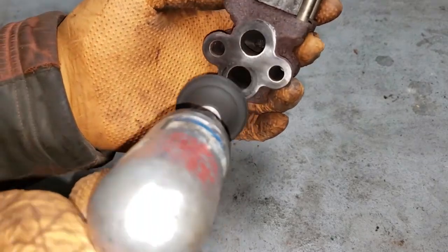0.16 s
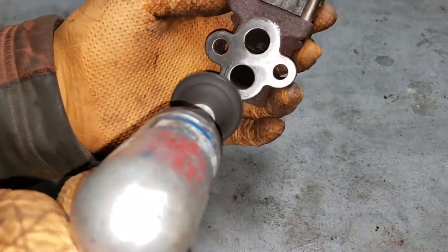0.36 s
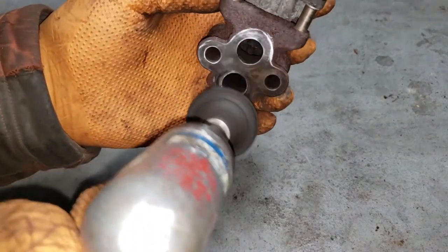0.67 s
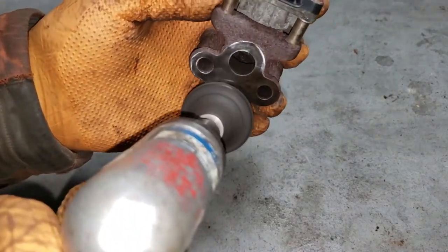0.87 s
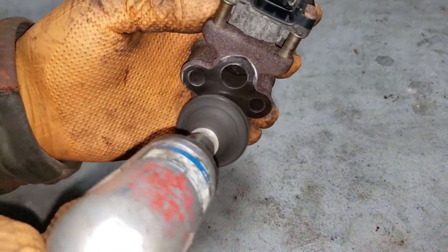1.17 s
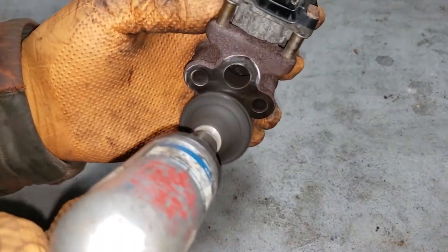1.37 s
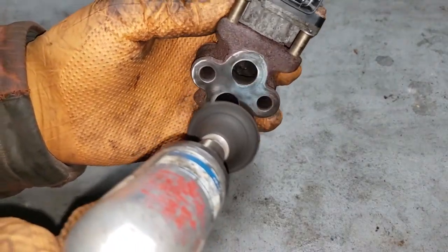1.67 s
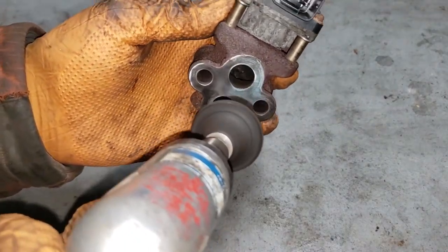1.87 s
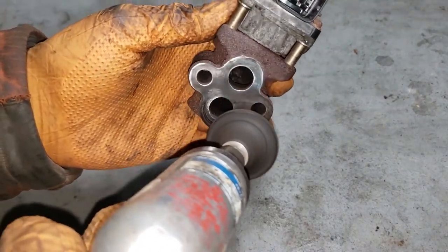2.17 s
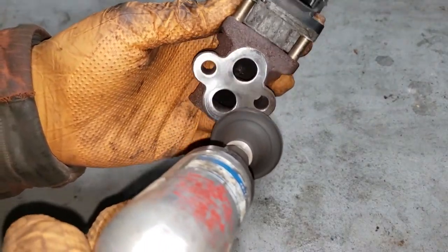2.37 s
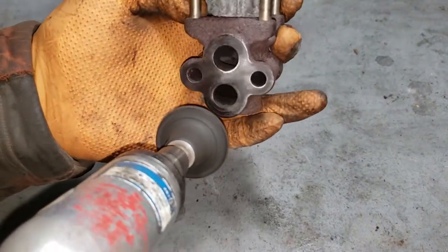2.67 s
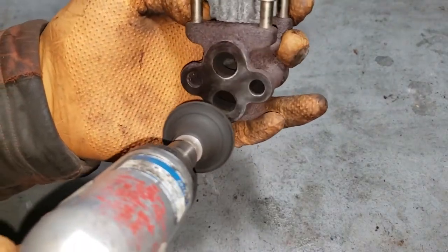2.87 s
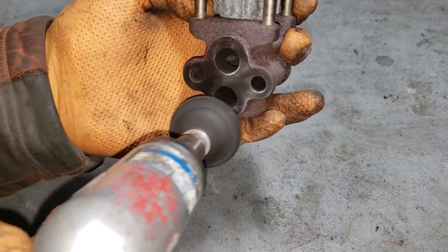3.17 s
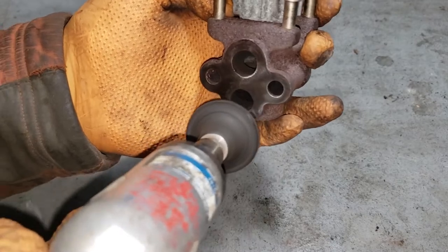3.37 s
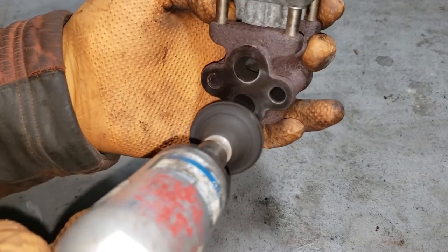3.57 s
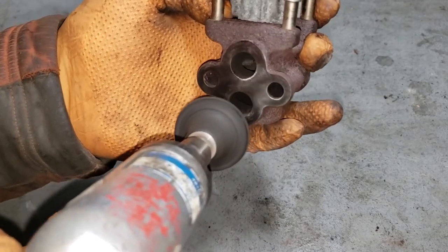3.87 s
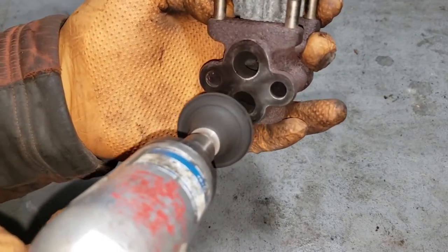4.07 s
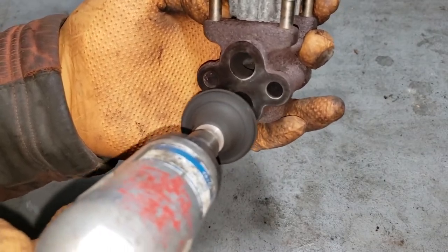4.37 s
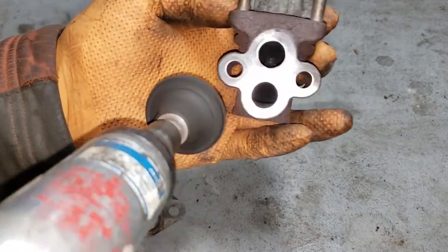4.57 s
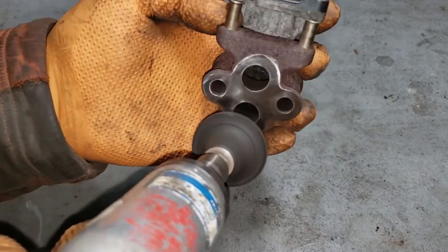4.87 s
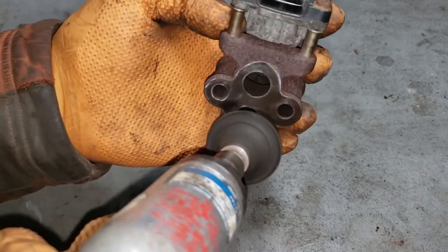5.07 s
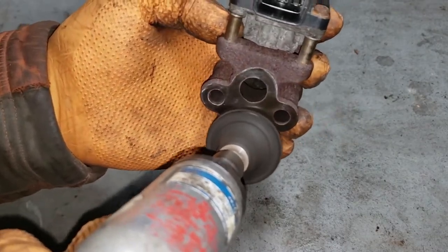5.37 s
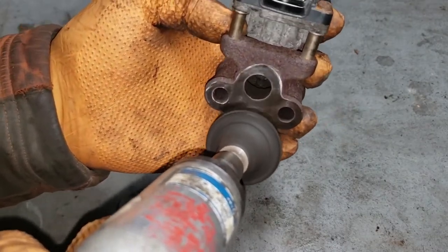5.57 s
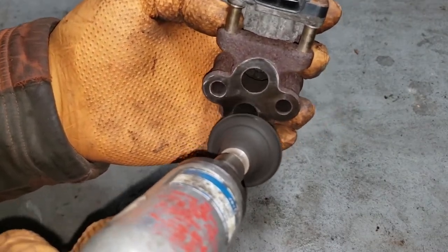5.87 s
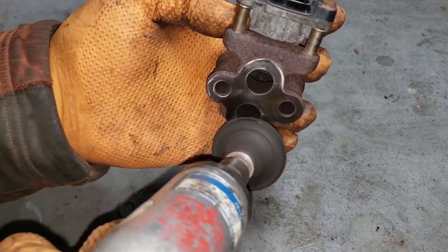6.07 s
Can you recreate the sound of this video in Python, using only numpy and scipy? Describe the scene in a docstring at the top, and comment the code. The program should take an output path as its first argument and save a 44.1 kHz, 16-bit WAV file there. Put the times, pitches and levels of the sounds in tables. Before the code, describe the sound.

An air grinder whines and hisses as it sands rusty metal up close, briefly winding down twice and spinning back up faster.

```python
"""A hissing whine with a rasp under it: an air die grinder sands rust off a hand-held iron casting,
close by in a garage. Its four-vane rotor hums and whines through the housing, the exhaust hisses
in puffs, and the small disc scrapes and sings on the metal. Pressure on the disc sags the speed;
twice the air drops away, the rotor runs down and then spins up again."""
import sys
import numpy as np
from scipy import signal
from scipy.fft import rfft, irfft, next_fast_len
from scipy.io import wavfile

SR = 44100
rng = np.random.default_rng(int(sys.argv[2]) if len(sys.argv) > 2 else 0)


def transcribe(u):
    """Save the signal u as a 16-bit wav file named by the first command-line argument.

    u: samples, shape (n,) or (channels, n), limited to [-1, 1]; the rate is SR.
    q: integer samples, one column per channel.
    """
    v = np.clip(np.atleast_2d(u).T, -1, 1)
    q = np.round(v * 32767).astype(np.int16)
    wavfile.write(sys.argv[1], SR, q)


N = 274302
TIME_S = np.arange(N) / SR
FFT_SIZE = 2 * next_fast_len(N // 2 + 1, True)
BINS_HZ = np.fft.rfftfreq(FFT_SIZE, 1 / SR)
CRUISE_HZ, ROTOR_LAG_S = 140, 0.018  # middling shaft speed; rotor's lag behind the air supply

# Housing and exhaust passage resonances: centre_hz, half_width_hz, tone_gain_db, hiss_lift_db
HOUSING_MODES = [(1165, 247, -27, 0.5), (1404, 242, -24, -9.5), (2337, 200, -18, -3), (2706, 400, -18, 0.5),
                 (3330, 380, -19, -3.5), (4191, 103, -2.5, 2), (4537, 90, -3.5, 8), (7475, 170, -16, 5),
                 (10800, 360, -6.5, 2), (12280, 460, -9.5, 2.5)]
# Speed under load with the valve open, one table per sanding pass: time_s, shaft_hz
PASS_SPEEDS = [
    [(0.0, 115.5), (0.15, 110.8), (0.35, 117.9), (0.8, 114.2), (1.0, 104.5), (1.2, 104.1), (1.5, 107.0),
     (1.8, 105.9), (2.1, 104.0), (2.39, 104.2)],
    [(2.77, 169.5), (3.1, 163.5), (3.3, 163.0), (3.57, 161.7), (3.8, 151.6), (4.15, 149.0), (4.39, 136.5),
     (4.6, 131.2)],
    [(4.81, 179.5), (4.9, 177.2), (4.96, 167.8), (5.15, 154.0), (5.34, 144.4), (5.52, 144.0), (5.63, 148.5),
     (5.9, 136.0), (6.05, 140.0), (6.22, 135.4)],
]
# Hold on the tool, one row per pass: order_16_db, order_20_db, notch_hz
PASS_GRIPS = [(1, -1.5, 3110), (2.5, 2.5, 3680), (4.5, -1, 3560)]
# Valve eased off between passes: closing_s, lowest_s, opening_s, open_s, air_drop_db, shudder_db
AIR_CUTS = [(2.488, 2.612, 2.614, 2.724, -15.5, 11.5), (4.61, 4.72, 4.73, 4.765, -13.5, 1.5)]


def amp(db):
    """Decibels to gain."""
    return 10 ** (np.asarray(db) / 20)


def peak(hz, centre_hz, half_width_hz):
    """Resonance bell, 1 at its top."""
    return 1 / (1 + ((hz - centre_hz) / half_width_hz) ** 2)


def bump(centre_s, half_s):
    """Bell in time, 1 at its top."""
    return np.exp(-((TIME_S - centre_s) / half_s) ** 2)


def curve(rows, column=1):
    """One column of a time table at every sample."""
    rows = np.array(rows)
    return np.interp(TIME_S, rows[:, 0], rows[:, column])


def at_hz(rows, hz):
    """Frequency table interpolated on a log axis."""
    row_hz, values = np.transpose(rows)
    return np.interp(np.log(hz + 1), np.log(row_hz + 1), values)


def drift(rate_hz):
    """Random wander of rms 1, rolled off above the rate."""
    t = np.linspace(0, N / SR, 2 ** 14)
    low_pass = peak(np.fft.rfftfreq(len(t), t[1]), 0, rate_hz)
    wander = irfft(rfft(rng.standard_normal(len(t))) * low_pass)
    return np.interp(TIME_S, t, wander / np.sqrt(np.mean(wander ** 2)))


def ports(hz):
    """Complex gains of the left and right microphone ports, mean power 1."""
    # Level between ports: freq_hz, left_minus_right_db
    balance = [(100, 2), (450, 2), (750, -1), (1500, 8.5), (1850, 4), (2600, 6.5), (3600, 1.5), (5000, 7.5),
               (5900, 13.5), (8300, 2.5), (10500, 11), (12000, -2.5), (13500, 15), (16000, -12)]
    # Phase between ports: freq_hz, left_lead_rad
    lead = [(50, 0), (400, .6), (1500, 1.4), (1900, 3.1), (2400, 6.1), (3100, 6.6), (3500, 8.9), (4400, 11),
            (5200, 11.7), (6200, 16), (7300, 18), (8200, 20), (10600, 27), (12400, 31), (16000, 32)]
    left = amp(at_hz(balance, hz) / 2) * np.exp(0.5j * at_hz(lead, hz))
    pair = np.array([left, 1 / left])
    return pair / np.sqrt(np.mean(abs(pair) ** 2, axis=0))


def noise(spectrum_db):
    """Coloured noise, partly alike at the two ports; their average has rms 1."""
    # Likeness of the ports: freq_hz, coherence
    likeness = [(50, 0.54), (400, 0.47), (1400, 1), (1900, 0.58), (2600, 0.15), (3800, 0.043), (4550, 1),
                (5500, 0.32), (16000, 0.084)]
    common, separate = rfft(rng.standard_normal((2, FFT_SIZE)))
    coherence = np.clip(at_hz(likeness, BINS_HZ), 0, 1)
    spectra = np.array([common, coherence * common + np.sqrt(1 - coherence ** 2) * separate])
    pair = irfft(spectra * ports(BINS_HZ) * amp(spectrum_db))[:, :N]
    return pair / pair.mean(0).std()


def tone(hz, steady, flutter, flutter_hz):
    """Line at both ports, with a steady and a fluttering part."""
    envelope = steady + flutter * (drift(flutter_hz) + 1j * drift(flutter_hz))
    carrier = np.exp(2j * np.pi * (np.cumsum(hz) / SR + rng.random()))
    port_gains = np.repeat(ports(hz[::64]), 64, axis=1)[:, :N]
    return (port_gains * envelope * carrier).real


def by_pass(values):
    """One value or curve per pass, crossfaded as the valve reopens."""
    out = values[0]
    for value, (_, _, opening_s, open_s, _, _) in zip(values[1:], AIR_CUTS):
        out = out + (value - out) * np.interp(TIME_S, [opening_s, open_s], [0, 1])
    return out


def valve_db(lag_s=0):
    """Air supply: 0 dB when open; each cut falls fast at first, then climbs back evenly."""
    t = TIME_S - lag_s
    supply_db = 0
    for closing_s, lowest_s, opening_s, open_s, drop_db, _ in AIR_CUTS:
        closed = 1 - np.interp(t, [closing_s, lowest_s], [1, 0]) ** 2
        supply_db += drop_db * closed * np.interp(t, [opening_s, open_s], [1, 0])
    return supply_db


def working_hz():
    """Open-valve shaft speed across all passes."""
    return by_pass([curve(rows) for rows in PASS_SPEEDS])


def airflow_db(cruise_db=-25.2, db_per_hz=0.022, surge_db=2, surge_s=0.074):
    """A faster rotor passes more air; stored pressure escapes at each reopening."""
    flow_db = cruise_db + db_per_hz * (working_hz() - CRUISE_HZ) + valve_db()
    for _, _, opening_s, open_s, _, _ in AIR_CUTS:
        rise = np.interp(TIME_S, [opening_s, open_s], [0, 1]) ** 2
        flow_db += surge_db * rise * np.exp(-np.maximum(TIME_S - open_s, 0) / surge_s)
    return flow_db


def shaft(speed_db_per_air_db=0.78):
    """Rotor speed in Hz and angle in turns; the disc drags more unevenly when slow."""
    # Disc slips off an edge and the rotor races: time_s, extra_speed_share, half_length_s
    slips = [(2.431, .18, .014), (2.488, .18, .014)]
    shaft_hz = working_hz() * amp(speed_db_per_air_db * valve_db(ROTOR_LAG_S))
    shaft_hz *= 1 + sum(extra * bump(time_s, half_s) for time_s, extra, half_s in slips)
    wobble = 0.00289 * np.minimum(150 / shaft_hz, 2) ** 3
    shaft_hz *= 1 + wobble * drift(rate_hz=45)
    return shaft_hz, np.cumsum(shaft_hz) / SR


def freedom(shaft_hz, loaded_hz=107, free_hz=150):
    """0 for a hard-pressed rotor, 1 for a free-running one."""
    return np.clip((shaft_hz - loaded_hz) / (free_hz - loaded_hz), 0, 1)


def garage(x, t60_s=0.34, wet_db=-16, gap_s=0.004):
    """Adds faint scattered reflections off floor and walls."""
    t = TIME_S[:SR // 2]
    taps = rng.standard_normal((2, len(t))) * amp(-60 * t / t60_s) * (t > gap_s)
    taps /= np.linalg.norm(taps, axis=1, keepdims=True)
    return x + amp(wet_db) * signal.fftconvolve(x, taps, axes=1)[:, :N]


def rumble(shaft_hz, cruise_db=-54, load_db_per_hz=0.0575, db_per_air_db=0.3):
    """Tool and casting shake, more as the shaft slows, less without air."""
    # Shaking spectrum: freq_hz, density_db
    spectrum = [(20, -24), (50, -3), (110, -2.5), (250, 1.5), (380, 0.5), (550, -4.5), (900, -2.5),
                (2000, -39), (16000, -51)]
    load_db = load_db_per_hz * (CRUISE_HZ - shaft_hz)
    level_db = cruise_db + load_db + db_per_air_db * valve_db(ROTOR_LAG_S)
    return amp(level_db) * noise(at_hz(spectrum, BINS_HZ))


def hum(shaft_hz, base_db=-47.5, db_per_air_db=0.1, bearing_order=6.5):
    """Vane beat, unbalance and a bearing tone; they shudder and the bearing rattles at each air cut."""
    # Low rotor lines: shaft_order, gain_db, steady_part, flutter_part
    lines = [(1, -10, .5, .6), (2, -15, .5, .6), (3, -19, .3, .6), (4, 0, .9, .42), (6.5, -16, .4, .6)]
    shudder_db = sum(db * bump(closing_s + 0.038, half_s=0.026) for closing_s, *_, db in AIR_CUTS)
    rattle_db = 15 * sum(bump(closing_s + 0.068, half_s=0.025) for closing_s, *_ in AIR_CUTS)
    out = np.zeros((2, N))
    for order, gain_db, steady, flutter in lines:
        hz = order * shaft_hz
        body_db = 6.5 * peak(hz, centre_hz=320, half_width_hz=140)  # tool body resonance
        gain = amp(gain_db + body_db + rattle_db * (order == bearing_order))
        out += gain * tone(hz, steady, flutter, flutter_hz=38)
    return amp(base_db + db_per_air_db * valve_db(ROTOR_LAG_S) + shudder_db) * out


def whistles(shaft_hz):
    """The fast air stream whistles faintly at fixed pitches once the rotor runs freely."""
    # Air whistles: pitch_hz, half_width_hz, level_re_hiss_db
    lines = [(4580, 110, -18), (7500, 170, -18), (10720, 110, -16), (12300, 300, -20), (14850, 180, -21)]
    fuzzy_tones = sum(amp(db) * tone(np.full(N, hz), steady=0, flutter=1, flutter_hz=width_hz)
                      for hz, width_hz, db in lines)
    return freedom(shaft_hz) * amp(airflow_db()) * fuzzy_tones


def bursts():
    """Rough swells around the air cuts, as the disc catches an edge or the air surges."""
    # Noise bands: time_s, level_db, half_length_s, centre_hz, half_width_hz
    swells = [(2.445, -34.5, 0.0076, 1230, 110), (2.442, -38, 0.018, 2650, 400),
              (2.514, -35.5, 0.032, 2580, 507), (2.516, -31.5, 0.02, 374, 115),
              (2.72, -33, 0.033, 3020, 600), (4.572, -38, 0.012, 1530, 109.6),
              (4.644, -31.5, 0.036, 2970, 455), (4.784, -30.5, .02, 2944, 650)]
    return sum(amp(db) * bump(time_s, half_s) * noise(20 * np.log10(peak(BINS_HZ, hz, width_hz)))
               for time_s, db, half_s, hz, width_hz in swells)


def disc(turns, scrape_gain_db=-9, sing_gain_db=1, wander_hz=48):
    """Grit scrapes the casting, hardest once a turn; stick-slip makes the disc sing unsteadily."""
    # Scrape spectrum: freq_hz, density_db
    spectrum = [(200, -14), (800, -38), (1150, 1), (1500, 10.5), (1800, -3), (2500, -10), (4500, -7.5),
                (9000, -14), (16000, -69)]
    # Disc bearing on the metal: time_s, level_db, pitch_hz
    contact = [(0, -39.5, 1319), (.83, -39, 1385), (.97, -33, 1397), (1.37, -32, 1375), (1.48, -35.5, 1430),
               (1.65, -34, 1457), (1.78, -39.5, 1330), (2.5, -34, 1228), (2.75, -44.5, 1196),
               (4.55, -51.5, 1456), (5.4, -40, 1395), (6.22, -45, 1415)]
    stroke = 1 + 0.27 * np.cos(2 * np.pi * turns + drift(rate_hz=17))
    scrape = amp(scrape_gain_db) * noise(at_hz(spectrum, BINS_HZ))
    pitch_hz = curve(contact, column=2) + wander_hz * drift(rate_hz=55)
    sing = amp(sing_gain_db) * tone(pitch_hz, steady=0.6, flutter=0.2, flutter_hz=70)
    return amp(curve(contact) + valve_db()) * stroke * (scrape + sing)


def grip_notch(x, depth=0.39, width_hz=330):
    """Shallow notch that shifts with the hold on the tool."""
    centre_hz = by_pass([hz for _, _, hz in PASS_GRIPS])
    carrier = np.exp(2j * np.pi * np.cumsum(centre_hz) / SR)
    pole = np.exp(-np.pi * width_hz / SR)
    band = 2 * (carrier * signal.lfilter([1 - pole], [1, -pole], x / carrier)).real
    return x - depth * band


def exhaust(turns, vanes=4, gust_db=1, sway_db=0.61):
    """The air jet puffs with each turn and each vane, coloured by the housing."""
    # Jet spectrum: freq_hz, density_db
    spectrum = [(100, -19.5), (500, -16), (800, -20.5), (1400, -11.5), (1850, -7.5), (2300, -4), (3600, -3),
                (4200, -3), (5150, -8), (6200, -2.5), (8500, -7), (10200, -3), (13000, -1.5), (16000, -1)]
    lift_db = sum(db * peak(BINS_HZ, hz, width_hz) for hz, width_hz, _, db in HOUSING_MODES)
    angle_rad = 2 * np.pi * turns
    puffs = 1 + 0.13 * np.cos(angle_rad + drift(rate_hz=8.9)) + 0.17 * np.cos(vanes * angle_rad)
    flow_db = airflow_db() + gust_db * drift(rate_hz=340) + sway_db * drift(rate_hz=14)
    return amp(flow_db) * puffs * noise(at_hz(spectrum, BINS_HZ) + lift_db)


def whine(shaft_hz, gain_db=2, fade_db=1.13, fuzzy_flutter=0.47, clear_flutter=0.23):
    """Air-driven rotor overtones swell as they slide through the housing resonances."""
    # Vane overtones (multiples of 4), bearing and uneven-vane lines between: shaft_order
    orders = [6.5, 7, 7.42, 8, 9, 9.75, 10.55, 12, 15, 16, 17, 20, 24, 28, 32, 36, 46, 72, 76]
    # Strength of each line: gain_db
    order_gains = [5, -2.5, -2.5, 2, -9.5, -3, 1.5, 4.5, -1.5, 6, -10, 3.5, -2, -5.5, -7, -5.5, 0, -3, 0]
    # Lines that turn clear when the rotor runs freely: shaft_order
    clear_orders = [12, 16, 20, 28, 76]
    # Fade of orders 16 and 20 as load slows the shaft: db_per_hz
    sag_slopes = [0.21, 0.07]
    housing = np.sqrt(sum((amp(db) * peak(BINS_HZ, hz, width_hz)) ** 2
                          for hz, width_hz, db, _ in HOUSING_MODES))
    sag_hz = by_pass([curve(rows).max() - curve(rows) for rows in PASS_SPEEDS])
    handling_db = {order: by_pass([grip[i] for grip in PASS_GRIPS]) - sag_slopes[i] * sag_hz
                   for i, order in enumerate((16, 20))}
    out = np.zeros((2, N))
    for order, db in zip(orders, order_gains):
        hz = order * shaft_hz
        line_db = db + handling_db.get(order, 0) + fade_db * drift(rate_hz=7)
        clarity = freedom(shaft_hz) * (order in clear_orders)
        flutter = fuzzy_flutter + clarity * (clear_flutter - fuzzy_flutter)
        steady = np.sqrt(1 - 2 * flutter ** 2)  # constant power
        out += amp(line_db) * np.interp(hz, BINS_HZ, housing) * tone(hz, steady, flutter, flutter_hz=45)
    return amp(gain_db + airflow_db()) * out


def scene():
    """The grinder in the garage, edging from the left toward the middle."""
    shaft_hz, turns = shaft()
    motor = hum(shaft_hz) + whine(shaft_hz) + rumble(shaft_hz)
    air = grip_notch(exhaust(turns)) + whistles(shaft_hz)
    grinder = motor + air + disc(turns) + bursts()
    pan_db = np.linspace(0.56, 0.25, N)
    return garage(grinder * amp([pan_db, -pan_db]))


def record(dry, cutoff_hz=15780):
    """The level dips briefly six times; a low-pass trims the top treble."""
    # Level dips: time_s, depth_db, half_length_s
    dips = [(0.283, 11.5, 0.0038), (0.746, 7.5, 0.0045), (0.792, 7, 0.004), (2.413, 11, 0.0029),
            (3.787, 5, 0.0035), (5.507, 4, 0.0081)]
    dip_db = sum(db * bump(time_s, half_s) for time_s, db, half_s in dips)
    low_pass = signal.firwin(601, cutoff_hz, window=("kaiser", 8), fs=SR)
    return signal.oaconvolve(dry * amp(-dip_db), low_pass[None], "same", axes=1)


dry = scene()
out = record(dry)
transcribe(out)
```